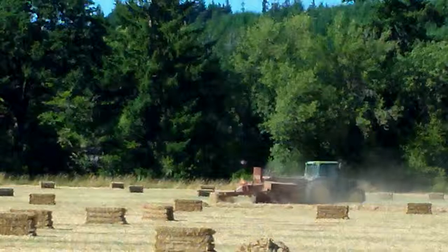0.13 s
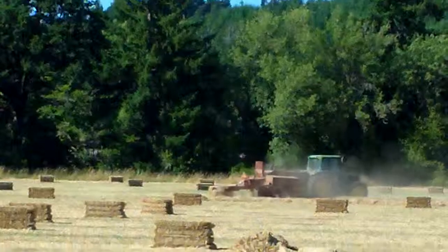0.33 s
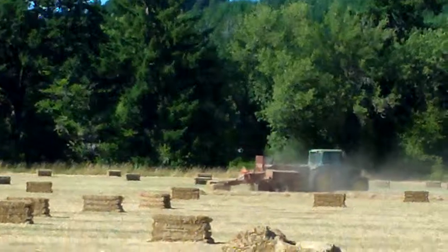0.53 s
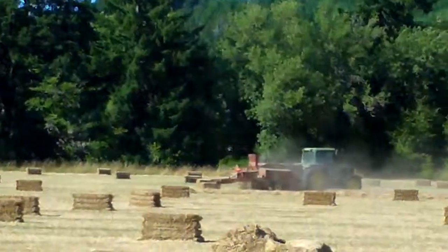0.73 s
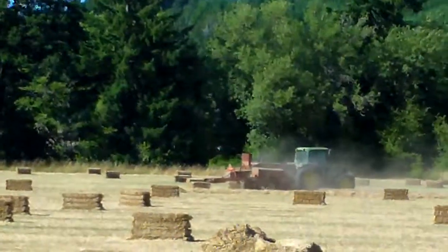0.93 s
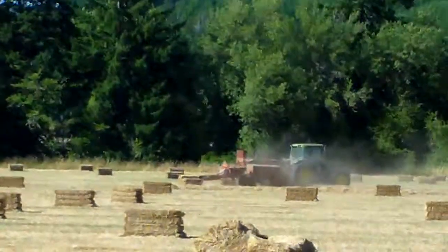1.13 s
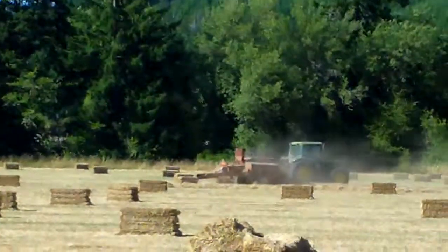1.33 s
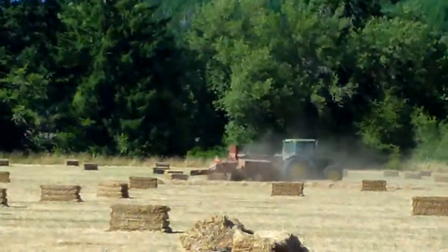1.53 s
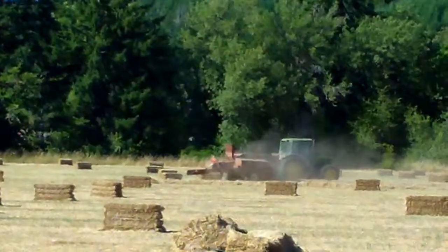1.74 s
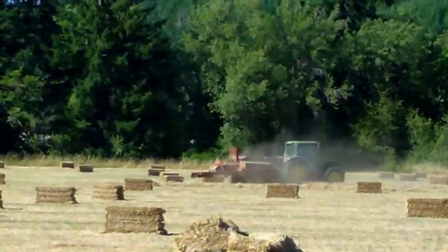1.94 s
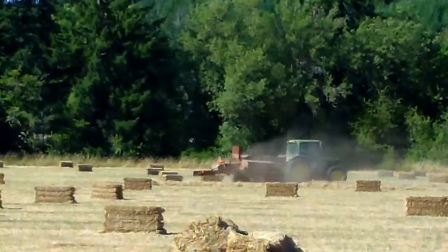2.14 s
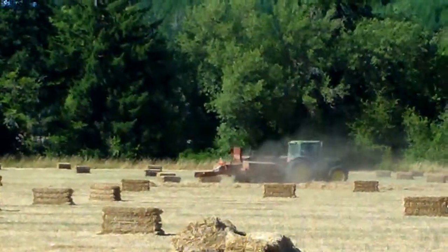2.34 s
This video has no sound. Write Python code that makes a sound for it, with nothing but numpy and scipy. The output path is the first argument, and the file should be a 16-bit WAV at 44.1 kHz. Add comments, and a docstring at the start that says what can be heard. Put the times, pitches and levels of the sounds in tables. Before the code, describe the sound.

A distant tractor and hay baler rattle, clatter and drone in an open field, swelling just before one second with metallic knocks, then fading as low wind gusts thump a small microphone.

```python
"""A far stubble field: a tractor pulls a baler, its rattle, clatter and drone swelling with the air.
Machines are shaped noise beating with the diesel firings; knocks of plunger and knotter are decaying
bursts of clank and lower body. Gusts on the small microphone are fluttering eddies and single
pressure swings, over faint hissing noise. The sound opens abruptly after a short silence."""
import sys
import numpy as np
from scipy import signal
from scipy.fft import rfft, irfft, next_fast_len
from scipy.io import wavfile
from scipy.ndimage import uniform_filter1d

SR = 44100
rng = np.random.default_rng(int(sys.argv[2]) if len(sys.argv) > 2 else 0)


def boost_factor(decibels):
    """Convert a level in decibels to a linear amplitude factor."""
    exponent = np.asarray(decibels, float) / 20
    return 10 ** exponent


def log_audio(samples):
    """Write samples as a 16-bit WAV file to the path given in sys.argv[1]."""
    # one column per channel
    frames = np.atleast_2d(samples).T
    # limit to full scale, then quantise
    limited = np.clip(frames, -1, 1)
    pcm = np.round(limited * 32767).astype(np.int16)
    wavfile.write(sys.argv[1], SR, pcm)


N = 110250


def rms_one(x):
    """Scale to rms 1."""
    return x / np.sqrt(np.mean(x ** 2) + 1e-20)


def in_time(rows):
    """Interpolate the columns after time_s at every sample."""
    time_s, *columns = np.transpose(rows)
    return [np.interp(np.arange(N) / SR, time_s, column) for column in columns]


def drift(rate_hz):
    """Slow random curve of rms 1: noise through two equal poles at rate_hz, computed every 40 samples."""
    pole = np.exp(-2 * np.pi * rate_hz * 40 / SR)
    noise = rng.standard_normal(N // 40 + 2002)
    slow = signal.lfilter([1], [1, -2 * pole, pole ** 2], noise)[2000:]
    return np.interp(np.arange(N) / 40, np.arange(len(slow)), rms_one(slow))


def coloured(x, spectrum, patchy_db):
    """Shape to a spectrum, then let overlapping third-octave bands flicker independently; rms 1."""
    hz, db = np.transpose(spectrum)
    size = next_fast_len(N)
    octave = np.log2(np.arange(size // 2 + 1) * SR / size + 1)
    shaped = rfft(x, size) * boost_factor(np.interp(octave, np.log2(hz), db, left=-120))
    out = 0
    for centre in np.arange(np.log2(hz[0]), np.log2(hz[-1]) + 1 / 3, 1 / 3):
        mask = np.maximum(1 - 3 * abs(octave - centre), 0)
        band = irfft(shaped * mask, size)[:N]
        out = out + boost_factor(patchy_db * drift(rate_hz=9.4)) * band
    return rms_one(out)


def microphone_hiss():
    """Faint hiss of shaped treble: steady microphone noise, with more hiss at the opening."""
    # relative spectrum: pitch_hz [Hz], density_db [dB per Hz]
    spectrum = [(3820, 10), (6500, 1.5), (8090, 0), (15100, -1), (16000, -8)]
    # hiss level: time_s [s], level_db [dB]
    level = [(.19, -58), (.33, -60), (.37, -63), (2.5, -63)]
    level_db, = in_time(level)
    return boost_factor(level_db) * coloured(rng.standard_normal(N), spectrum, patchy_db=0.3)


def eddies(eddy_hz):
    """Flutter at a wandering pitch, randomly swelling over a few cycles, with a squared overtone."""
    width_per_pitch, evenness, overtone_db = 0.55, 0.7, -13.5
    cycles = np.cumsum(eddy_hz) / SR
    knots = rng.standard_normal((2, 1500))
    swell = [np.interp(cycles * width_per_pitch * 2, np.arange(1500), k) for k in knots]
    real, imag = uniform_filter1d(swell, size=150)
    swell = (real + 1j * imag) / (np.hypot(real, imag) + 0.28) ** evenness
    eddy = swell * np.exp(2j * np.pi * cycles)
    return rms_one(eddy.real) + boost_factor(overtone_db) * rms_one((eddy ** 2).real)


def levelled_band(low_hz, high_hz):
    """Band of noise with most of its own swell levelled out; rms 1."""
    evenness = 0.85
    sos = signal.butter(3, [low_hz, high_hz], "band", fs=SR, output="sos")
    band = signal.sosfilt(sos, rng.standard_normal(N + SR))[SR:]
    window = int(2 * SR / np.sqrt(low_hz * high_hz))
    spread = np.sqrt(uniform_filter1d(band ** 2, size=window) + 1e-20)
    return rms_one(band / spread ** evenness)


def wind():
    """Wind on the microphone: fluttering eddies over a deep heave and a thin upper rasp."""
    # wind course: time_s [s], eddy level_db [dB], eddy pitch_hz [Hz],
    # heave_db and rasp_db [dB re eddy level, before trim]
    course = [(0.2, -28.5, 109.1, -40, -10), (0.23, -41, 87.6, 19, -10), (0.26, -26, 110.2, -11, -6),
              (0.29, -25.5, 128.4, -1.5, -9.5), (0.34, -33, 116.6, 0.5, -1.5), (0.37, -33, 101, 6.5, -8),
              (0.39, -33.5, 98.7, -14, -28), (0.42, -46, 92.1, 8, -19), (0.45, -55.5, 86.5, 8, 8),
              (0.47, -41, 88.9, -2, -20), (0.55, -56.5, 73.6, 7, 3.5), (0.59, -49.5, 79, 10, -4),
              (0.67, -48.5, 90, -23, 0), (0.73, -45.5, 76.5, 1.5, -8), (0.79, -54, 82.35, 7, 2),
              (0.82, -41, 83.2, -7, -7), (0.86, -48.5, 75.85, 13.5, -9), (0.89, -39.5, 82.7, -1, -18),
              (0.93, -53.5, 81.4, 6.5, -3), (0.96, -47, 80.8, 6.5, -3), (1.04, -47.5, 78, 4.5, -9),
              (1.06, -50, 77.1, 12.5, -14), (1.13, -47.5, 83.2, -6, -2.5), (1.18, -54.5, 81.3, 7.5, -9),
              (1.23, -36, 100.3, -7.5, -30), (1.27, -49.5, 80.4, -1, -6), (1.34, -46.5, 74.5, 6.5, -14),
              (1.41, -49, 83.54, -6, -3), (1.45, -51, 84, 9, -21), (1.48, -30.5, 95.1, 0.5, -13),
              (1.53, -33, 107.5, -2, -13), (1.55, -35.5, 105.8, 3, -3.5), (1.58, -28.5, 113.3, -16, -3.5),
              (1.61, -37, 105.6, 3, -35), (1.63, -48, 82.7, 12, -34), (1.66, -29.5, 103.9, 1.5, -11),
              (1.68, -34, 111.8, -21, -13), (1.72, -48.5, 78.3, 10.5, -25.5), (1.77, -36, 87.95, 2.5, -19),
              (1.79, -39, 96.6, -8, -36), (1.81, -25, 98.6, -8, -45), (1.84, -22.5, 98.7, -12, -34),
              (1.86, -41, 96.6, -18, -17), (1.88, -43.5, 95.5, 6, -33), (1.94, -26, 136.3, -19, -34),
              (1.97, -51, 119.6, -3, -9), (1.99, -32, 100.1, 2, -33), (2.03, -41, 104.4, -22, -24),
              (2.06, -42, 95.3, -2, -26), (2.13, -52, 77.53, 5, 7), (2.16, -36.5, 79.4, 9.5, -41),
              (2.18, -41.5, 83.2, -6, -1.5), (2.21, -41.5, 92.6, 5, -41), (2.24, -46.5, 91.2, -1, 2),
              (2.27, -40, 93.5, -15, -16), (2.3, -53, 78.7, 18.5, -11), (2.36, -44, 83.7, -4, -7),
              (2.4, -49.5, 83.5, 3, 5), (2.46, -48.5, 80, 0, -21), (2.5, -45, 83.5, 6, 6)]
    # heave and rasp bands: low_hz [Hz], high_hz [Hz]
    bands = [(20, 61.7), (220, 399)]
    trims_db = 0.8, -9.5
    level_db, eddy_hz, *shares_db = in_time(course)
    out = boost_factor(level_db) * eddies(eddy_hz)
    for (low_hz, high_hz), share_db, trim_db in zip(bands, shares_db, trims_db):
        out = out + boost_factor(level_db + share_db + trim_db) * levelled_band(low_hz, high_hz)
    return out


def buffets():
    """Hard gusts: one pressure push then pull each, steepened at the turn, under a Gaussian fade."""
    # buffets: turn_s [s], level_db [dB, before the fade], pitch_hz [Hz, before steepening]
    rows = [(0.2526, -25, 110), (0.2854, -15, 204), (.2995, -15, 186), (0.3342, -15, 197),
            (0.386, -22, 119), (1.493, -20.5, 184), (1.523, -21, 173.3), (1.572, -24.5, 232),
            (1.665, -26.5, 223.7), (1.673, -29, 228), (1.685, -33.5, 240), (1.838, -26, 189.6),
            (1.935, -31, 189), (2.027, -23, 109.6), (2.168, -21.5, 75.1), (2.209, -26.5, 110.5)]
    snap, tail_cycles = 1.43, 0.717   # steepening at the turn; fade length
    t, out = np.arange(N) / SR, 0
    for turn_s, level_db, pitch_hz in rows:
        cycles = (t - turn_s) * pitch_hz
        steepening = 1 + (snap - 1) * np.exp(-(4 * cycles) ** 2)
        swing = np.sin(2 * np.pi * cycles * steepening / (1 + 0.32 * abs(cycles)))
        out = out - boost_factor(level_db) * swing * np.exp(-(cycles / tail_cycles) ** 2)
    return out


def firings(depth):
    """Diesel firing envelope: a decaying burst per firing, of uneven strength, over a steady part."""
    firing_hz, jitter, decay_s, a_firing_s, spread_db = 73.6, 0.0027, 0.011, 0.860, 1.5
    turns = np.cumsum(firing_hz * (1 + jitter * drift(rate_hz=4.4)) / SR)
    turns = turns - turns[int(a_firing_s * SR)] + 100   # a firing falls at a_firing_s
    strength = boost_factor(spread_db * rng.standard_normal(400))[turns.astype(int)]
    burst = strength * np.exp(-(turns % 1) / firing_hz / decay_s)
    burst = uniform_filter1d(burst / burst.mean(), size=60)
    return 1 - depth + depth * burst


def rattle_grains():
    """Chain rattle impacts: sparse random clicks of either sign and uneven strength; rms 1."""
    per_s, spread_db = 3000, 6
    strength = boost_factor(spread_db * np.minimum(rng.exponential(1, N), 5))
    grains = strength * rng.choice([-1, 1], N)
    return rms_one(grains * (rng.random(N) < per_s / SR))


def rattle_focus(beat, focus_hz):
    """Narrow noise band inside the rattle: beating low-passed noise moved up to focus_hz; rms 1."""
    half_width_hz = 260
    sos = signal.butter(2, half_width_hz, fs=SR, output="sos")
    real, imag = signal.sosfilt(sos, beat * rng.standard_normal((2, N)))
    carrier = np.exp(2j * np.pi * np.cumsum(focus_hz) / SR)
    return rms_one(((real + 1j * imag) * carrier).real)


def machines():
    """Chain rattle, clatter and drone: shaped noise beating with the firings, carried by the air."""
    # how well the machines carry: time_s [s], rattle_db [dB], clatter_db and drone_db [dB re rattle],
    # firing beat depth [0-1], focus_hz [Hz]
    carry = [(.19, -52.5, -2, 1.5, .6, 4474), (.24, -53.5, -1.5, 2.5, 0.5, 4500),
             (.33, -55.5, -1, 3, 0.5, 4587), (.39, -61.5, 4, 7.5, 0.8, 4320),
             (.55, -52.5, 2, -2, 0.44, 4470), (.68, -47.5, -1, -6, 0.2, 4583),
             (.77, -46, -3.5, -6.5, 0.6, 4520), (.83, -45, -4, -9, 1, 4220), (.88, -42, -7, -8, 1, 4270),
             (.96, -46, -3.5, -13, 0.3, 4257), (1.04, -51.5, -1.5, -0.5, 0.13, 4124),
             (1.16, -56, 4, -0.5, 0.58, 4300), (1.3, -52.5, -1.5, -2.5, 0, 4310),
             (1.43, -54.5, -4, 0.5, 0.44, 4330), (1.6, -58, 6.5, 5, 1, 4456),
             (1.66, -56.5, 4.5, 1, 0.21, 4302), (1.8, -51, -4, -4.5, 0.34, 4317),
             (2.05, -57, 1.5, 3.5, 0.72, 4304), (2.12, -55, 0.5, -1, 0.33, 4314),
             (2.3, -57.5, 2.5, 4.5, 0.75, 4307), (2.5, -58.5, 2, 2, 0.51, 4293)]
    # relative spectra: pitch_hz [Hz], density_db [dB per Hz]
    rattle_spectrum = [(1650, -25), (2800, -8), (3110, -4), (3440, -5), (4250, -3.5), (4890, -5),
                       (5440, -17), (5960, -19.5), (6770, -30), (7330, -39), (8000, -32), (10400, -56),
                       (17600, -120)]
    # same columns
    clatter_spectrum = [(680, -42), (1150, -5), (1750, -2), (1940, -4.5), (2110, -2.5), (3100, -8),
                        (4030, -22), (6820, -120)]
    # same columns
    drone_spectrum = [(110, -32), (190, -7), (284, -13.5), (312, -13.5), (431, -4), (601, -9.5),
                      (850, -4.5), (1250, -6), (1620, -28), (2750, -120)]
    grain_share, focus_db = 0.5, -3   # focus re rattle
    rattle_db, clatter_db, drone_db, depth, focus_hz = in_time(carry)
    beat = firings(depth)
    white = rng.standard_normal((3, N))
    rattle = coloured(beat * white[0] + grain_share * rattle_grains(), rattle_spectrum, patchy_db=1.5)
    focus = rattle_focus(beat, focus_hz)
    clatter = coloured((0.65 + 0.37 * beat) * white[1], clatter_spectrum, patchy_db=0.9)
    drone = coloured((1 + 0.073 * beat) * white[2], drone_spectrum, patchy_db=0.0)
    mix = rattle + boost_factor(focus_db) * focus + boost_factor(clatter_db) * clatter + boost_factor(drone_db) * drone
    return boost_factor(rattle_db) * mix


def knocks():
    """Plunger and knotter knocks: bursts of clanking steel and lower body, smeared by the trees behind."""
    # knocks: start_s [s], level_db [dB, before trim and crack], t60_s [s],
    # body_db [dB re clank, at the start]
    rows = [(0.6365, -40, 0.22, -11), (0.7336, -32.5, 0.19, -17), (0.7863, -28.5, 0.22, -7.5),
            (1.4662, -47, 0.22, -11), (1.508, -36.5, 0.39, -10.5), (2.2467, -38.5, 0.21, -12)]
    # relative spectra: pitch_hz [Hz], density_db [dB per Hz]
    clank_spectrum = [(1760, -23), (3000, -9), (3230, -10.5), (4120, 1.5), (5040, -11), (5530, -18.5),
                      (7990, -35), (9000, -39), (11700, -52), (19800, -120)]
    # same columns
    body_spectrum = [(650, -22), (1100, -4), (1690, -4.5), (2020, -10), (2200, 1), (3000, -23), (3900, -28),
                     (6600, -120)]
    trim_db, attack_s = -6, 0.0003
    crack_db, crack_s = 3, 0.004   # extra edge at first contact
    body_fade_t60_s = 0.32   # on top of the knock's own decay
    t, out = np.arange(N) / SR, 0
    clank = coloured(rng.standard_normal(N), clank_spectrum, patchy_db=0.5)
    power = uniform_filter1d(clank ** 2, size=90)
    clank = rms_one(clank / (power + 0.056) ** 0.19)   # dense and even
    body = coloured(rng.standard_normal(N), body_spectrum, patchy_db=0.8)
    for start_s, level_db, t60_s, body_db in rows:
        age_s = np.maximum(t - start_s, 0)
        fall_db = crack_db * np.exp(-age_s / crack_s) - 60 * age_s / t60_s
        shape = boost_factor(level_db + trim_db + fall_db) * (1 - np.exp(-age_s / attack_s))
        out = out + shape * (clank + boost_factor(body_db - 60 * age_s / body_fade_t60_s) * body)
    return out


def scene():
    """Hiss, wind and buffets under the machines and knocks, one channel."""
    return (microphone_hiss() + wind() + buffets() + machines() + knocks())[None]


def roll_off(x):
    """The treble ends steeply here."""
    return signal.sosfilt(signal.butter(12, 16650, fs=SR, output="sos"), x)


def record(dry):
    """Silence, then an abrupt opening by a short linear fade."""
    opens_s, fade_s = 0.1912, 0.0008
    opening = np.clip((np.arange(N) / SR - opens_s) / fade_s, 0, 1)
    return roll_off(dry * opening)


dry = scene()
out = record(dry)
log_audio(out)
```